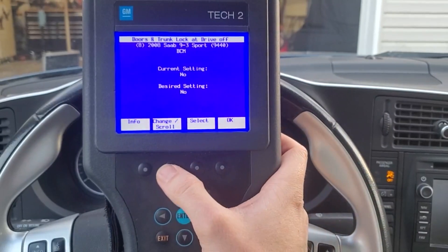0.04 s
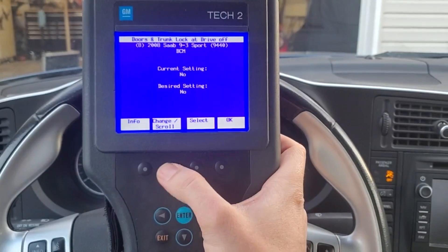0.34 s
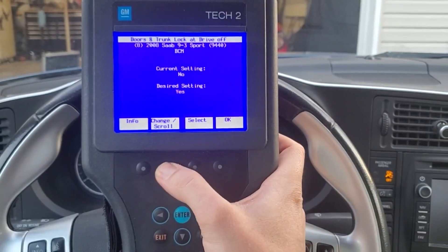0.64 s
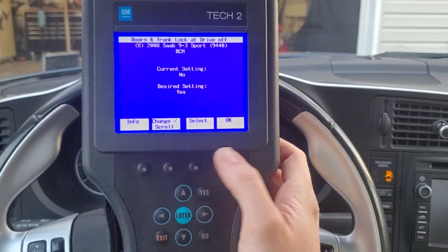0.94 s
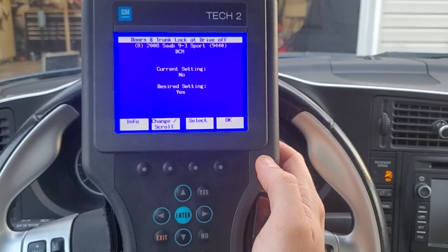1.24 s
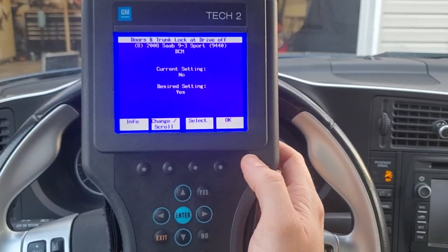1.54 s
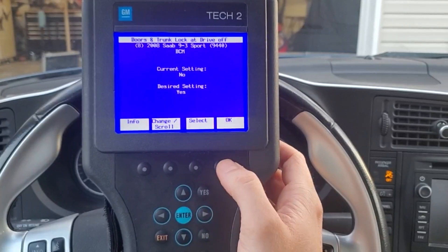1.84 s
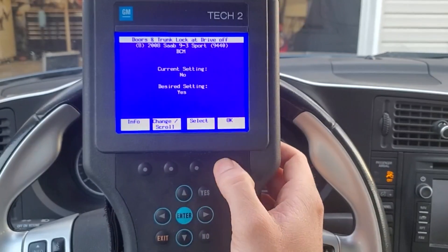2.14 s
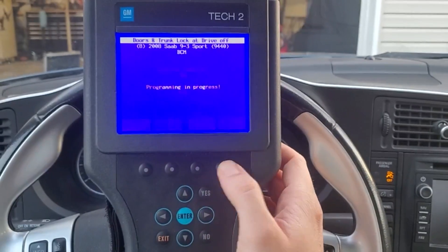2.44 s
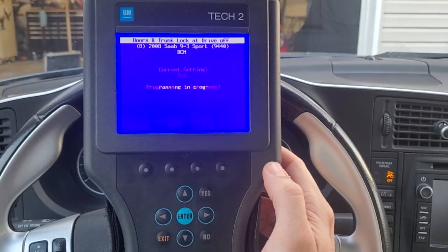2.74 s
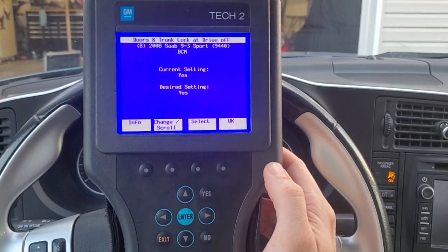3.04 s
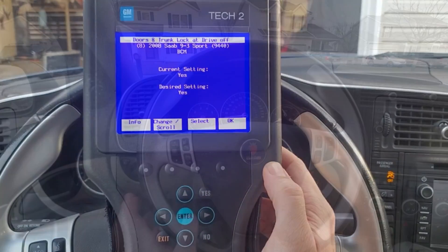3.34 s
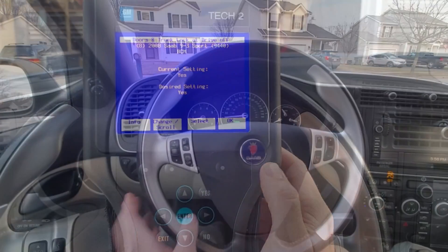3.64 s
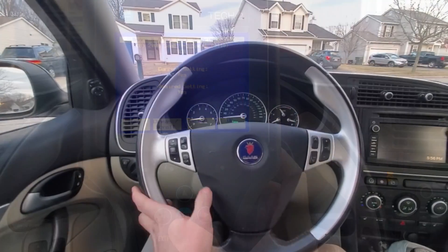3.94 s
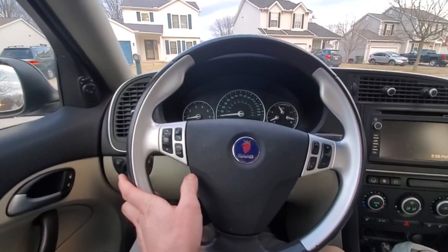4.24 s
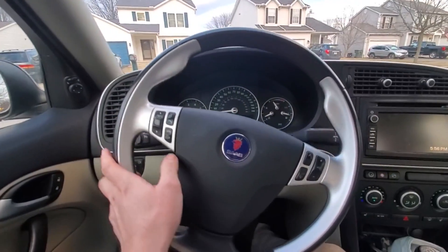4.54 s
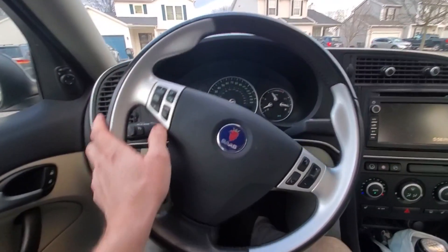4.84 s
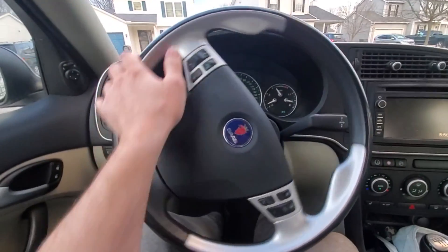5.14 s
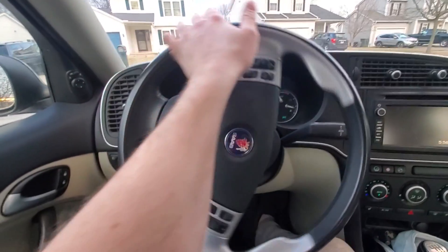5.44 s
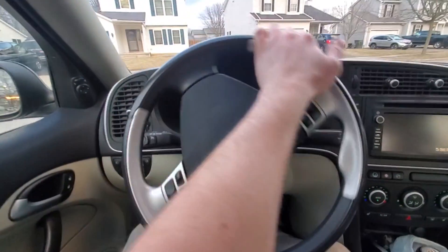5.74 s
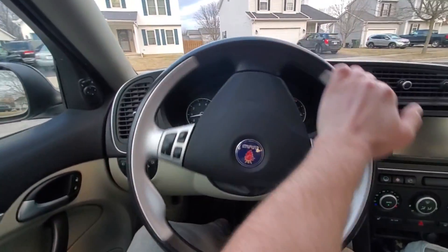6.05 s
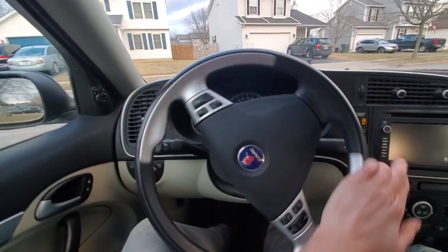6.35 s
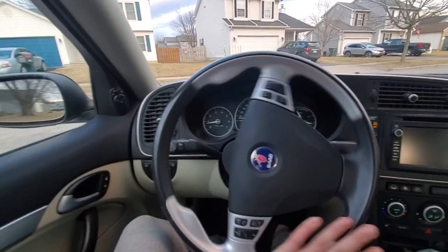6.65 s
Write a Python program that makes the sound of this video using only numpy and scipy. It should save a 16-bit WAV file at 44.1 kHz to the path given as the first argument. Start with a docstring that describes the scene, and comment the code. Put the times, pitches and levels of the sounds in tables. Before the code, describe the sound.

It begins quietly inside a parked car, with a faint low drone that swells and sinks over muffled outdoor rumble. Close and slightly left, a thumb works the keys of a hollow plastic hand-held tester: one clear click at about 0.5 seconds, faint knocks around 1 second, and two soft presses with a tiny squeak near 2.3 to 2.6. The background fades from 3 seconds. At 3.7 the sound cuts abruptly to the car moving, much louder: a low engine boom over road rumble, rushing air, tyre noise and a faint steady fan whine. A hand ticks on the steering wheel at 4.4, then slides and creaks lightly on it from 5 to 6.4 seconds. The engine rises in pitch from about 5.8, and at around 6.65 the door locks snap shut with a sharp double clunk, right at the end.

```python
"""A faint low drone over muffled outdoor rumble, heard from a stereo microphone inside a parked car.
Close by, a thumb works the keys of a plastic hand-held tester and rings its hollow case.
Abruptly the car is rolling: a four-cylinder engine booms in the cabin over road rumble, rushing air
and a fan's whine. A hand slides and ticks on the steering wheel, and as the engine speeds up
the door locks snap shut."""
import sys
import numpy as np
from scipy import signal
from scipy.fft import rfft, irfft
from scipy.io import wavfile
from scipy.ndimage import uniform_filter1d

SR = 44100
rng = np.random.default_rng(int(sys.argv[2]) if len(sys.argv) > 2 else 0)


def unload_wav(signal):
    """Save mono or channel-first audio to the path in sys.argv[1] as 16-bit WAV at rate SR, clipped to [-1, 1]."""
    wavfile.write(
        sys.argv[1],
        SR,
        np.round(np.clip(np.atleast_2d(signal).T, -1, 1) * 32767).astype(np.int16),
    )


N = 294588
T = np.arange(N) / SR
FREQ = np.maximum(np.arange(N // 2 + 1) * SR / N, 1)
LEFT_RIGHT = np.array([[1], [-1]])
ROLL_S = 3.714  # the moving car takes over from the parked one


def undb(db):
    """Decibels to gain."""
    return 10 ** (np.asarray(db) / 20)


def unit(x):
    """Scale to rms 1."""
    return x / np.sqrt(np.mean(x ** 2))


def curves(table):
    """The columns of a time table, one value a sample."""
    times, *columns = np.transpose(table)
    return [np.interp(T, times, column) for column in columns]


def shape(points):
    """A (frequency [Hz], level [dB]) table joined on a log-frequency axis."""
    hz, db = np.transpose(points)
    return np.interp(np.log(FREQ), np.log(hz), db)


def band(hz, width_hz):
    """Response in dB of one resonance."""
    return -10 * np.log10(1 + ((FREQ ** 2 - hz ** 2) / (FREQ * width_hz)) ** 2)


def lift(hz, resonances):
    """Boost in dB that a set of resonances gives at hz."""
    return sum(db / (1 + (2 * (hz - centre) / width) ** 2) for centre, width, db in resonances)


def pan(db):
    """Left and right gains, the left louder by db."""
    return undb(LEFT_RIGHT * db / 2)


def walk(rate):
    """Random wander with a spread near 1, at rate steps a second."""
    hold = max(int(SR / rate), 2)
    steps = np.repeat(rng.standard_normal(N // hold + 1), hold)
    return unit(uniform_filter1d(uniform_filter1d(steps, hold), hold)[:N])


def bump(s, half_s):
    """A bell-shaped swell of height 1 around time s."""
    return np.exp(-((T - s) / half_s) ** 2 / 2)


def ramp(s, length_s):
    """A straight rise from 0 to 1 that starts at time s."""
    return np.clip((T - s) / length_s, 0, 1)


def fade(t, t60):
    """Exponential decay, 60 dB down after t60."""
    return np.exp(-np.log(1000) * t / t60)


def grain(colour_db, size=16384):
    """A short stretch of diffuse stereo noise of a given colour, and its time axis."""
    gain = undb(np.interp(np.arange(size // 2 + 1) * SR / size, FREQ, colour_db))
    return unit(irfft(rfft(rng.standard_normal((2, size))) * gain)), np.arange(size) / SR


def add(out, s, sound):
    """Mix a sound in at time s."""
    i = int(np.clip(s * SR, 0, N - 1))
    out[:, i:i + sound.shape[1]] += sound[:, :N - i]


# stereo width at the microphone: (frequency [Hz], side minus mid [dB])
CABIN_WIDTH = [(40, -28.5), (110, -17), (200, -14), (380, -5.5), (650, -5), (820, -7.5), (1150, 4.5),
               (1450, 3.5), (1900, 0.5), (4400, -0.5), (9000, 2)]
# balance at the microphone: (frequency [Hz], left minus right [dB])
CABIN_LEAN = [(110, 0.5), (330, 1.5), (700, .5), (4400, 0.9), (15000, 1)]
def cabin_noise(colour_db):
    """Noise all round the microphone: the bass is alike on both sides, the treble diffuse."""
    mid, side = rfft(rng.standard_normal((2, N)))
    width = undb(shape(CABIN_WIDTH))
    pair = (mid + LEFT_RIGHT * width * side) / np.sqrt(1 + width ** 2)
    return unit(irfft(pair * pan(shape(CABIN_LEAN)) * undb(colour_db), N))


# outdoor rumble, heard from inside the car: (frequency [Hz], relative level [dB])
OUTDOOR_COLOUR = [(22, -20), (40, -3), (55, 1.5), (75, 2), (105, -7.5), (125, -8), (150, -13.5), (235, -21),
                  (320, -29.5), (450, -38), (800, -61.5)]
# hiss in the parked cabin: (frequency [Hz], relative level [dB])
PARKED_HISS = [(300, -8), (450, -6), (800, -7), (1300, -9.5), (3800, -16), (7000, -22), (15500, -15.5)]
# swells of the sound outside: (peak time [s], rise of the drone [dB], half length [s])
OUTDOOR_SWELLS = [(0.253, 6.5, 0.25), (0.88, 11.5, 0.13), (2.65, 15.5, 0.27)]
def parked(drone_hz=90.9, sag_hz=2.7, drone_db=-57, rumble_db=-55.5, upper_db=-66, hiss_db=-77):
    """A low drone swells and sinks over muffled outdoor rumble and faint hiss."""
    swell = sum(db * bump(s, half_s) for s, db, half_s in OUTDOOR_SWELLS)
    # the parked sound fades out before the cut to the moving car
    fade_db = -11 * np.maximum(T - 2.99, 0)
    hz = drone_hz - sag_hz * ramp(1.099, length_s=0.8)
    tone = np.sqrt(2) * np.sin(2 * np.pi * np.cumsum(hz) / SR)
    drone = tone * undb(drone_db + swell + fade_db / 2 + 1.46 * walk(11))
    outdoors = shape(OUTDOOR_COLOUR)
    rumble = cabin_noise(outdoors) * undb(rumble_db + fade_db)
    # the upper part of the rumble and the hiss take a share of each swell
    upper = cabin_noise(outdoors + band(190, width_hz=170)) * undb(upper_db + 0.78 * swell + fade_db)
    hiss = cabin_noise(shape(PARKED_HISS)) * undb(hiss_db + 0.24 * (swell + fade_db))
    return (drone + rumble + upper) * pan(2) + hiss


# presses and knocks on the tester: (time [s], level [dB], brightness [dB/octave], t60 [s], push [s])
KEY_PRESSES = [(0.468, -57, -1, 0.12, 0.0016), (0.479, -35, 0, 0.099, 0.0071),
               (0.5514, -55, -1, 0.041, 0.00055), (0.583, -62, -7.5, 0.21, 0.0033),
               (0.891, -61, -15.5, 0.12, 0.0063), (1.164, -66.5, -2.5, .1, .002),
               (1.206, -70.5, -3, .1, .004), (2.338, -51.5, -8, 0.17, 0.0037),
               (2.550, -56, -11.5, 0.19, 0.0037)]
# modes of the case and the hollow it sits in: (frequency [Hz], relative level [dB], t60 [s])
CASE_MODES = [(116.6, -1.5, 0.5), (162.5, -1.5, 0.3), (197.2, -1.5, 0.29), (371, -4, 0.092), (576, 3, 0.1),
              (776, 5, 0.073), (910, -5, 0.14), (1322, -1, 0.063), (1647, -7, 0.088), (2440, -9, 0.063),
              (2870, -10, 0.11)]
# contact noise of the case: (frequency [Hz], relative level [dB])
RATTLE_COLOUR = [(80, -23), (180, -4.5), (350, -6), (800, 2), (1100, -7.5), (2800, -10), (4300, -15.5),
                 (5600, -17.5), (7500, -26), (12500, -29), (15500, -38)]
def keys(ring_db=-7, pivot_hz=700, knee_hz=380):
    """Close by on the left, each press rattles and rings the hollow case; duller ones thump more."""
    def octaves(hz):
        return np.log2(np.maximum(hz, knee_hz) / pivot_hz)

    out = np.zeros((2, N))
    for s, db, bright, t60, push_s in KEY_PRESSES:
        rattle, t = grain(shape(RATTLE_COLOUR) + bright * octaves(FREQ))
        ring = 0
        for hz, mode_db, mode_t60 in CASE_MODES:
            # long waves reach both sides of the microphone in step, short ones do not
            offset = rng.random() + min(hz / 2000, 1) * rng.random((2, 1))
            mode = fade(t, mode_t60) * np.sin(2 * np.pi * (hz * t + offset))
            ring = ring + mode * undb(mode_db + bright * octaves(hz))
        push = 1 - np.exp(-t / push_s)
        add(out, s, (rattle * fade(t, t60) + undb(ring_db) * ring) * push * undb(db))
    return out * pan(4.5)


# the thumb rubs the hollow case: (mid time [s], level [dB], half length [s])
CASE_RUBS = [(0.837, -72, 0.016), (0.91, -69.5, 0.015), (2.603, -66.5, 0.013), (2.729, -69.5, 0.024)]
# skin squeaks on a key: (mid time [s], level [dB], half length [s], pitch [Hz])
KEY_SQUEAKS = [(2.59, -63, 0.0074, 8900), (2.734, -74.5, 0.021, 3800)]
# skin on plastic and leather: (mid time [s], level [dB], half length [s], centre [Hz], width [Hz])
SKIN_SLIDES = [(0.932, -81, 0.021, 5000, 14000), (1.603, -77, 0.031, 6000, 14000),
               (2.591, -63.5, 0.015, 8500, 10000), (3.83, -72.5, 0.051, 13000, 7000),
               (3.957, -65.5, 0.04, 13000, 5000), (5.32, -67.5, 0.089, 12990, 7000),
               (6.13, -72, 0.13, 11920, 8010), (6.652, -63.5, .02, 9050, 11980)]
def slides(rub_hz=794, rub_width_hz=83, squeak_width_hz=190, rough_db=1.5):
    """Within arm's reach, moving skin rubs, squeaks and hisses in uneven swells."""
    out = np.zeros((2, N))
    rubs = [(*row, rub_hz, rub_width_hz) for row in CASE_RUBS]
    squeaks = [(*row, squeak_width_hz) for row in KEY_SQUEAKS]
    for s, db, half_s, hz, width in rubs + squeaks + list(SKIN_SLIDES):
        hiss, t = grain(band(hz, width))
        middle = t[-1] / 2
        stroke = np.exp(-((t - middle) / half_s) ** 2 / 2)
        add(out, s - middle, hiss * stroke * undb(db))
    return out * undb(rough_db * walk(200))


def tick(db, hz, t60, attack_s=0.0012):
    """One small bright snap."""
    snap, t = grain(2 * band(hz, 1.14 * hz))
    return snap * fade(t, t60) * (1 - np.exp(-t / attack_s)) * undb(db)


# lone ticks of fingers and trim: (time [s], level [dB], centre [Hz], t60 [s])
LONE_TICKS = [(2.249, -67, 7000, .03), (3.090, -65, 1940, 0.066), (4.424, -42, 4750, 0.023),
              (5.745, -49, 5000, 0.048)]
# the steering wheel creaks under the hand:
# (time [s], ticks [count], first gap [s], level [dB], change per tick [dB], centre [Hz], t60 [s])
RIM_CREAKS = [(4.974, 3, .032, -60, 0, 9000, .04), (5.2244, 3, .0232, -51.5, 2.5, 9510, 0.027),
              (5.952, 7, .0435, -54.5, -1, 6960, 0.059), (6.332, 2, .018, -56.5, 5.5, 4800, 0.077)]
def ticks(gap_ratio=0.92):
    """Skin sticks and lets go, near and to the left: lone ticks, and quickening runs on the rim."""
    out = np.zeros((2, N))
    for s, db, hz, t60 in LONE_TICKS:
        add(out, s, tick(db, hz, t60))
    for s, count, gap_s, db, step_db, hz, t60 in RIM_CREAKS:
        for k in range(round(count)):
            add(out, s, tick(db + k * step_db, hz, t60))
            s += gap_s * gap_ratio ** k
    return out * pan(3.5)


def pull_away(start_db=-7, settle_s=0.21):
    """How far in dB the driving noise still lies under its steady level."""
    return start_db * np.exp(-np.maximum(T - ROLL_S, 0) / settle_s)


# the engine, heard from the cabin: (time [s], firing rate [Hz], boom level before lift [dB])
FIRINGS = [(3.72, 38.3, -34), (3.87, 37.86, -32), (4.04, 34.46, -44), (4.3, 39.13, -25),
           (4.71, 39.52, -28.5), (5.19, 38.22, -28), (5.6, 34.6, -35.5), (5.76, 36.0, -26),
           (6.02, 42.85, -23), (6.41, 50.05, -22.5), (6.46, 52.12, -33.5), (6.61, 54.6, -29.5),
           (6.68, 54, -29)]
# low resonances of the cabin air: (frequency [Hz], width [Hz], lift [dB])
AIR_MODES = [(91.4, 17.8, 9), (119.4, 12.2, 8.5)]
def engine(second_db=-37, third_db=-47, uneven_db=0.86):
    """Firings boom in the cabin, whose air lifts their harmonics; also returns the firing phase."""
    hz, first_db = curves(FIRINGS)
    phase = 2 * np.pi * np.cumsum(hz) / SR
    boom = 0
    for k, db in enumerate([first_db, second_db + 2.3 * pull_away(), third_db], 1):
        shake = k * uneven_db * walk(22)  # uneven combustion shakes the higher harmonics more
        harmonic = np.sin(k * phase + rng.uniform(0, 2 * np.pi))
        boom = boom + harmonic * undb(db + lift(k * hz, AIR_MODES) + shake)
    return np.sqrt(2) * boom, phase


# road rumble through the body: (frequency [Hz], relative level [dB])
ROAD_RUMBLE = [(22, -23), (35, -11.5), (60, -3.5), (94, 1), (108, -1.5), (125, 0), (155, -11.5), (190, -9),
               (230, -17.5), (320, -17), (450, -27.5), (700, -59.5)]
# rushing air, heard from inside: (frequency [Hz], relative level [dB])
AIR_RUSH = [(250, -11), (420, 0), (650, 0), (1000, -3.5), (1500, -5), (2300, -12.5), (3500, -14),
            (5000, -22), (6900, -27), (7700, -37), (9000, -31), (15500, -62)]
# cabin resonances in the rush: (frequency [Hz], width [Hz], lift [dB])
CABIN_MODES = [(762, 90, 7), (887, 36, 4), (1110, 57, 3.5), (1250, 87, 6), (1400, 100, 1.5),
               (1770, 65, 6.5), (1990, 113, 7), (2445, 73, 4.5), (2800, 58, 0), (3490, 250, 2.5)]
def road(firing_phase, rumble_db=-33, rush_db=-43.5, ease_db_per_s=0.62, bumps_db=1.4, throb=0.072):
    """Tyres shake the body; rushing air rings the cabin, slowly eases and throbs with each firing."""
    rumble = cabin_noise(shape(ROAD_RUMBLE))
    rumble *= undb(rumble_db + 0.74 * pull_away() + bumps_db * walk(18))
    rush = cabin_noise(shape(AIR_RUSH) + lift(FREQ, CABIN_MODES))
    rush *= undb(rush_db + pull_away() - ease_db_per_s * (T - ROLL_S) + 0.5 * walk(30))
    return rumble + rush * (1 + throb * np.sin(firing_phase))


def tread(level_db=-52, centre_hz=825, flutter_db=2.5, turn_s=5.52, turn_half_s=0.12):
    """Tread blocks pump air in a narrow band that swells as the wheels turn in, then drops away."""
    turning_db = 6.5 * bump(turn_s, turn_half_s) - 3.5 * ramp(turn_s, turn_half_s)
    song = cabin_noise(3 * band(centre_hz, 150))
    return song * undb(level_db + pull_away() + turning_db + flutter_db * walk(16))


# whine of the fan: (time [s], pitch [Hz])
FAN_WHINE = [(3.74, 285.7), (4.25, 295.3), (4.9, 295), (5.4, 292), (6.68, 289)]
def fan(whine_db=-50, waver_db=1.0):
    """Left of the microphone, a small electric motor holds one slightly wavering tone."""
    hz = curves(FAN_WHINE)[0]
    tone = np.sqrt(2) * np.sin(2 * np.pi * np.cumsum(hz) / SR)
    return tone * undb(whine_db + pull_away() + waver_db * walk(11)) * pan(6)


# lock bolts, one door after another: (time [s], level [dB], t60 [s])
LOCK_BOLTS = [(6.6418, -26, .025), (6.655, -42, .08), (6.6735, -25, .045)]
# a door panel struck by its bolt: (frequency [Hz], relative level [dB])
PANEL_COLOUR = [(60, -8), (200, 4), (450, 2), (850, 0), (1400, -12), (2600, -9), (4400, -22), (7000, -35),
                (15500, -42)]
def locks(attack_s=0.0015, spread=0.5):
    """Around the microphone, the bolts hit their stops and thump the door panels."""
    out = np.zeros((2, N))
    for s, db, t60 in LOCK_BOLTS:
        (mid, side), t = grain(shape(PANEL_COLOUR))
        thump = (mid + spread * side * LEFT_RIGHT) / np.sqrt(1 + spread ** 2)
        add(out, s, thump * fade(t, t60) * (1 - np.exp(-t / attack_s)) * undb(db))
    return out


def scene():
    """The parked cabin, then the moving one, with the hand close by in both."""
    rolling = ramp(ROLL_S, length_s=0.0019)
    boom, firing_phase = engine()
    moving = boom + road(firing_phase) + tread() + fan() + locks()
    return (1 - rolling) * parked() + rolling * moving + keys() + ticks() + slides()


def record(dry):
    """The microphone in the cabin loses the deepest bass and cuts the top."""
    low_cut = signal.butter(2, 16, "high", fs=SR, output="sos")
    high_cut = signal.ellip(14, 0.1, 80, 15700, fs=SR, output="sos")
    return signal.sosfilt(high_cut, signal.sosfilt(low_cut, dry))


dry = scene()
out = record(dry)
unload_wav(out)
```